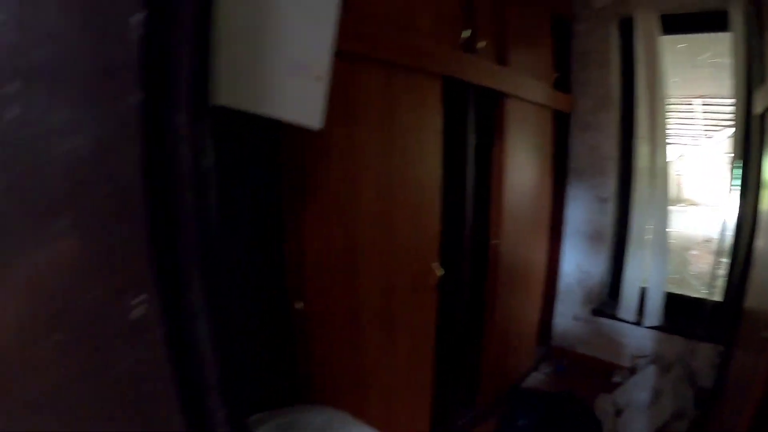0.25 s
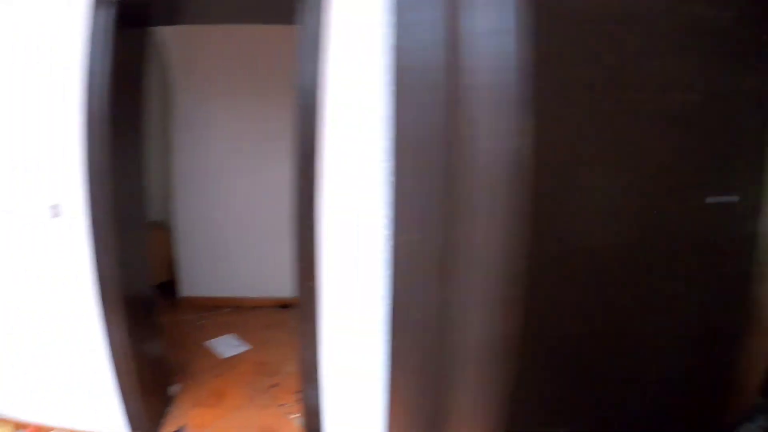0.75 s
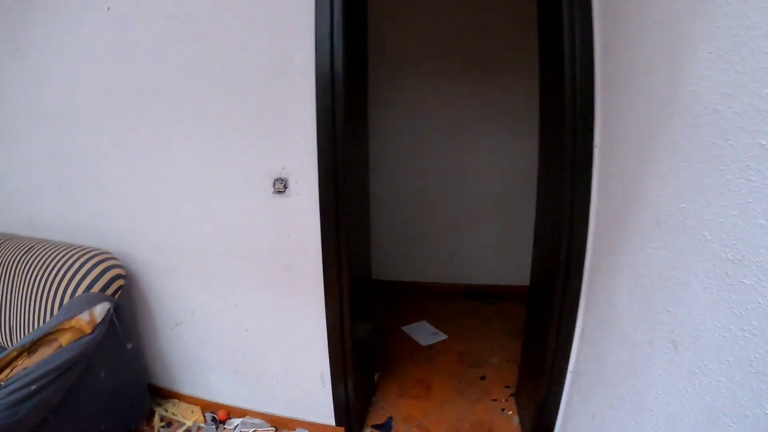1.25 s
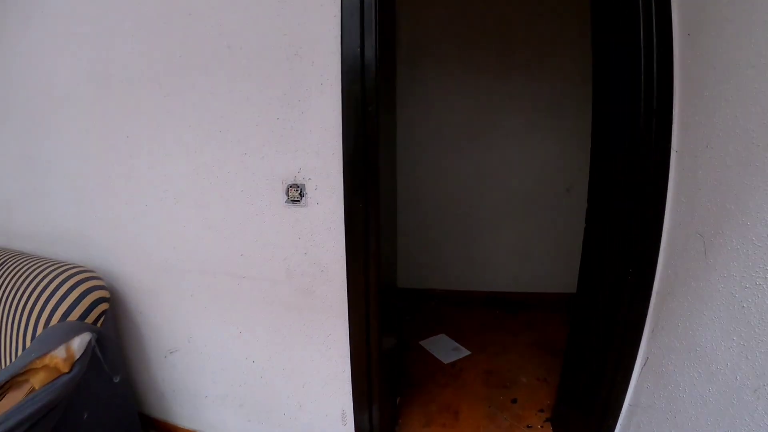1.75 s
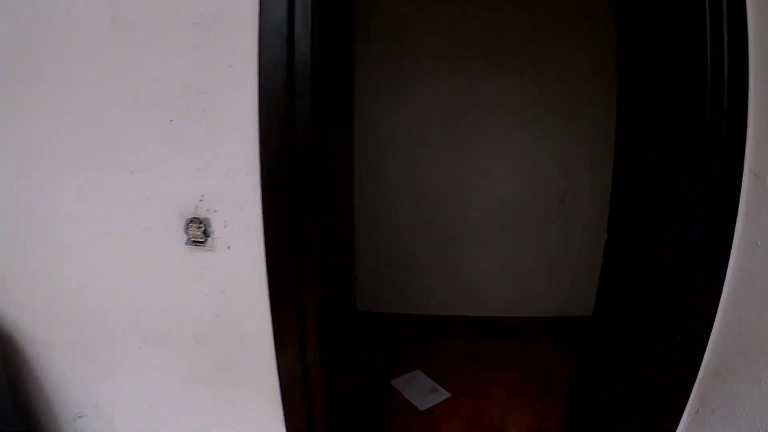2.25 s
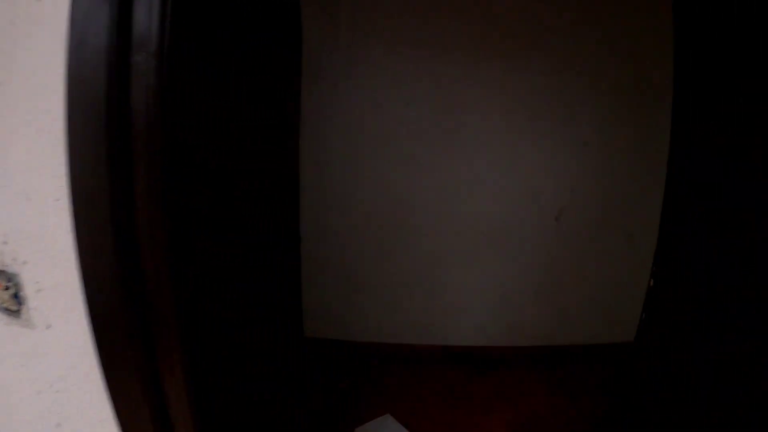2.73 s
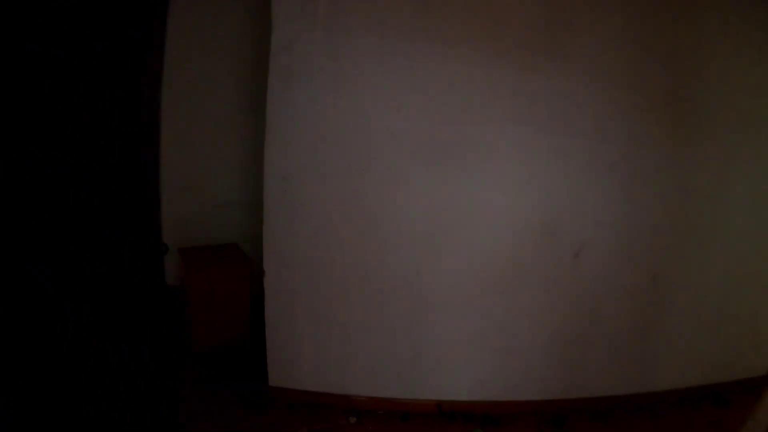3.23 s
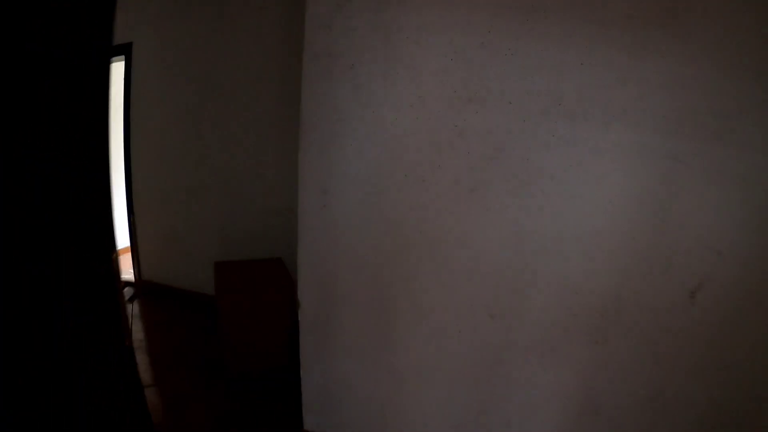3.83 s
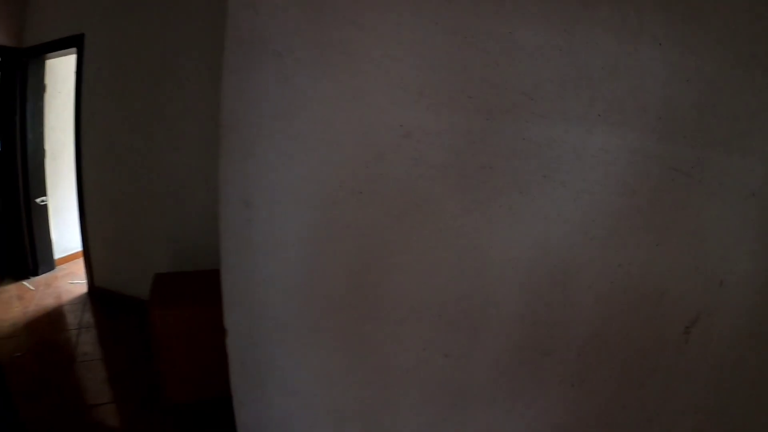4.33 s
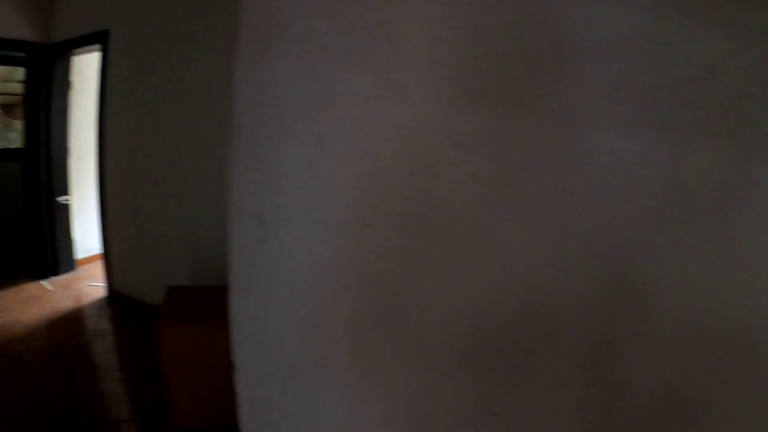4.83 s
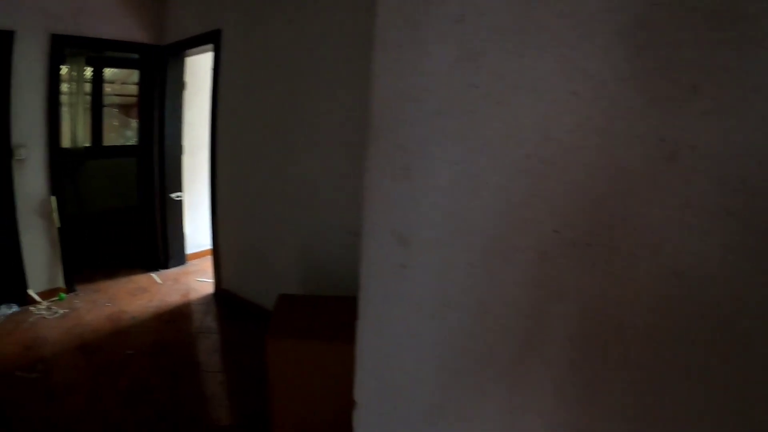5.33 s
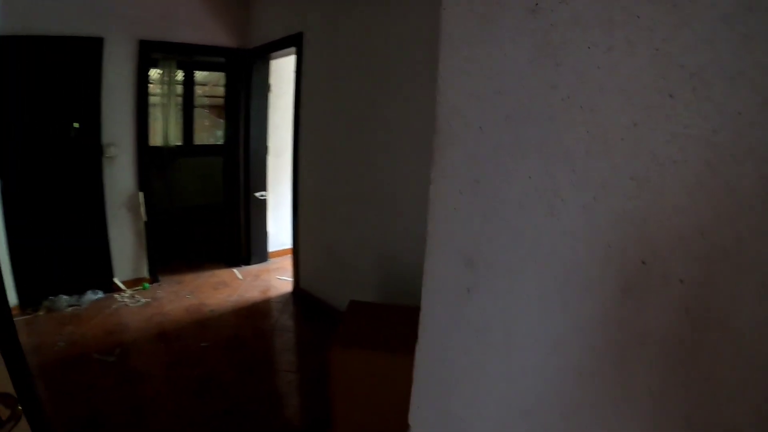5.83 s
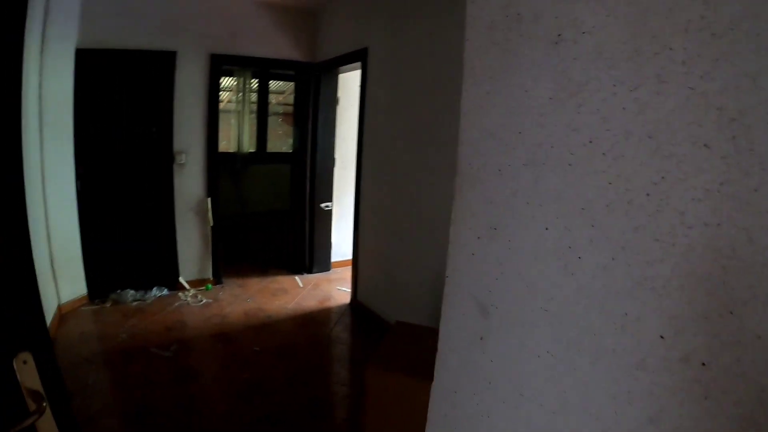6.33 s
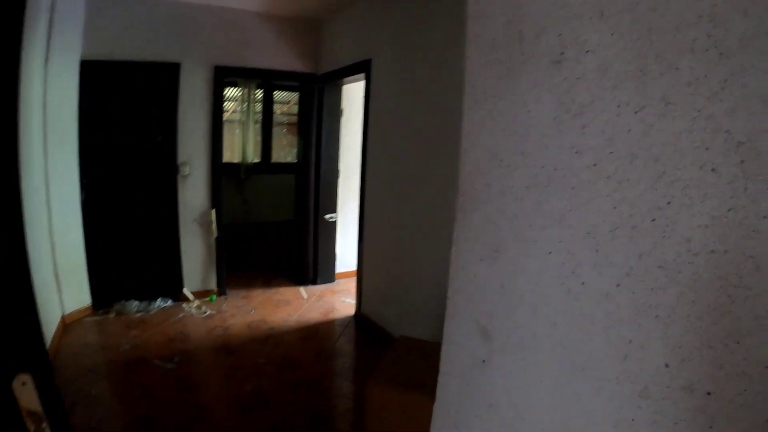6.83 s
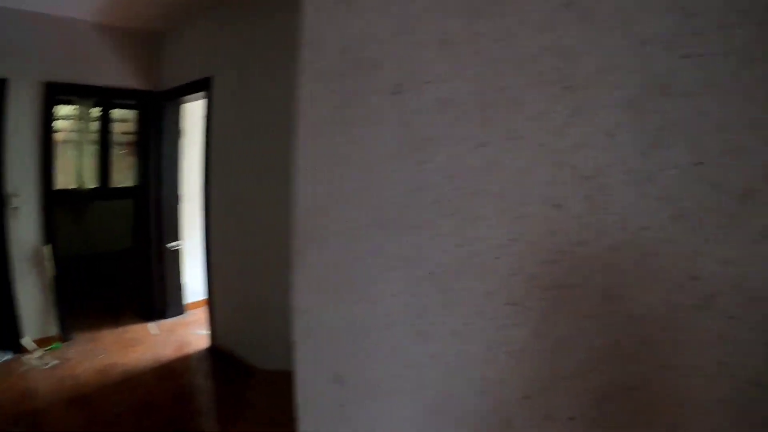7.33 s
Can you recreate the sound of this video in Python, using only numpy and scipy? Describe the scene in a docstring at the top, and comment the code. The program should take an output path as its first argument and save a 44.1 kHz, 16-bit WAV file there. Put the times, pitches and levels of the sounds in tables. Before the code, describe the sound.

Slow footsteps cross a littered floor in an abandoned flat, heard from a carried microphone over a faint, hollow outdoor hush. Each step has a light trouser rustle, a soft heel thump and grinding grit. At the start a shard scrapes, squeaks and tips over with a sharp clink and crack, the loudest moment, in a fairly dull room. Around 1 second air rumbles briefly on the microphone, and a crunching step follows; from here the steps echo in a bare hall. Heels land at about 2.1, 2.9, 3.7, 4.7 and 5.8 seconds, snapping plaster flakes and skidding on grit. Near 3 seconds a glass splinter tinks, and a loose tile clacks underfoot then and again from 3.8 to 4.3 seconds. A scrap of board knocks at about 6.4 seconds. After a short pause, lighter steps scuff, squeak and crackle from 7.1 to 7.6 seconds.

```python
"""Slow steps through an abandoned flat

Someone walks from a furnished bedroom into a bare hall, carrying a microphone. Trousers rustle and
each heel thumps the floor; the sole then grinds plaster grit, snaps flakes, knocks loose pieces and
drags squealing shards along. The rooms ring after every step. Faint outdoor noise seeps in, and air
brushes the microphone as it swings through a doorway."""
import sys
import numpy as np
from scipy import signal
from scipy.fft import rfft, irfft, next_fast_len
from scipy.io import wavfile
from scipy.ndimage import uniform_filter1d

SR = 44100
rng = np.random.default_rng(int(sys.argv[2]) if len(sys.argv) > 2 else 0)


def put_to_file(sound):
    """Save the sound as 16-bit audio at rate SR, in the file named by the first command-line argument."""
    columns = np.atleast_2d(sound).T  # one column per channel
    safe = np.clip(columns, -1, 1)
    whole_steps = np.round(safe * 32767)
    wavfile.write(sys.argv[1], SR, whole_steps.astype(np.int16))


N = 334278
TIME = np.arange(N) / SR
FFT_SIZE = 2048
FREQS = np.maximum(np.arange(FFT_SIZE // 2 + 1) * SR / FFT_SIZE, 1)

# tone of the outdoor noise: f/Hz, level/dB
OUTDOOR_TONE = [(25, -2), (50, -6.5), (95, -38.5), (160, 2), (270, -10.5), (500, -13.5), (1400, -16),
                (2500, -24), (5000, -24.5), (8500, -30.5), (10500, -36.5), (15000, -46)]
# stereo width of sound from all around: f/Hz, side level over middle/dB
STEREO_WIDTH = [(280, -15), (600, -9), (1500, -5), (3500, -2), (9000, 0)]
# how the microphone's two openings differ: f/Hz, left level over right/dB
MIC_BALANCE = [(250, .4), (1200, 2.2), (2800, 2.6), (5500, 0), (9000, -1), (12000, -3.2)]
# bands of the room echo: f/Hz, time to fade by 60 dB/s, level/dB
ECHO_BANDS = [(142, 0.95, 4), (255, 0.8, 5.5), (736, 0.37, -0.5), (1380, 0.74, -1.5), (3225, 0.66, -4),
              (6900, 0.6, -3.5), (9900, 0.4, -9)]
# low notes that hum between the walls: f/Hz, level/dB
ROOM_NOTES = [(65, 12), (144, 11), (268, 5.5), (328, 10.5), (530, 8.5)]
# the walker stands still: middle t/s, half length/s
PAUSES = [(1.06, 0.086), (6.91, 0.34)]
# tone of rubbing cloth: f/Hz, level/dB
CLOTH_TONE = [(60, -31.5), (220, 3), (600, -5.5), (1500, -0.5), (4000, -4.5), (8500, -12.5), (14000, -34.5)]
# tone of snapping plaster: f/Hz, level/dB
PLASTER_TONE = [(100, -29), (350, -12.5), (650, -10), (1000, -4), (2000, -2.5), (4000, -5.5), (6500, -11),
                (9000, -14.5), (11000, -24.5), (13500, -25), (15500, -49.5)]
# large flakes snapping: t/s, level/dB, ring f/Hz, snap level over ring/dB
FLAKE_SNAPS = [(.084, -37, 2630, 4), (.1785, -14, 3000, -28), (.469, -49.5, 2780, 17),
               (1.136, -29, 1960, 12), (1.1472, -24.5, 1640, -1), (1.795, -55, 1690, 10),
               (2.076, -46, 6040, -16), (2.361, -48, 2330, -5), (2.706, -40.5, 2600, 12),
               (2.863, -45, 2380, 11), (3.109, -38, 2870, -1), (4.001, -35, 3740, -42),
               (4.113, -29.5, 3900, 27), (4.4625, -35.5, 3200, -9), (4.4672, -38.5, 4080, -5),
               (4.4877, -37.5, 3540, 2), (4.591, -36.5, 1300, -6), (4.861, -32, 1300, 1),
               (4.8635, -35.5, 4670, -17), (4.969, -43, 1670, 2), (5.0265, -32, 1750, -19),
               (5.029, -28.5, 4300, -2.5), (5.758, -52, 2700, -5), (5.812, -45.5, 1560, -4.5),
               (5.8495, -31.5, 3850, 0.5), (5.93, -36, 3270, 4), (5.937, -37.5, 3310, -2),
               (6.0165, -36, 2200, -5.5), (6.205, -45, 3660, 1), (6.235, -44, 3460, -10),
               (6.259, -46, 1590, -6), (7.375, -33.5, 2340, 24), (7.446, -37.5, 3520, 9),
               (7.47, -29, 2820, 0), (7.5645, -35.5, 1940, -1)]
# the sole skidding on grit: peak t/s, length/s, level/dB, ring f/Hz, snap level over ring/dB
SKIDS = [(0.129, 0.043, -36, 695, 7.5), (0.188, 0.029, -27, 2570, 2.5), (0.532, 0.016, -45.5, 5570, -9),
         (1.154, 0.039, -28.5, 1720, 16), (2.94, 0.035, -41, 1700, 9), (3.029, 0.082, -39, 1890, -5),
         (3.014, 0.04, -38, 860, -15), (3.713, 0.017, -37, 4500, -1), (3.746, 0.017, -40.5, 5040, 13),
         (3.784, 0.023, -27.5, 923, -9), (3.996, .024, -37.5, 1830, 1), (4.334, 0.12, -41.5, 2750, -1.5),
         (4.828, 0.024, -44.5, 1150, -26), (5.175, 0.04, -50, 1490, 1), (7.127, 0.03, -38, 6370, 1),
         (7.396, 0.068, -45, 1120, -0.5)]
# shards and the rubber sole squealing: start t/s, end t/s, first level/dB, last level/dB,
# two strong notes f/Hz, weak note f/Hz, rise in pitch (0.1 is a tenth)
SQUEALS = [(0.028, 0.08, -62, -49.5, 2350, 3740, 4860, 0.032),
           (0.082, 0.199, -43.5, -39, 2387, 4030, 5080, 0.038),
           (0.507, 0.534, -56, -43.5, 1052, 2038, 1208, 0.019),
           (2.556, 2.56, -42.5, -40.5, 1395, 1485, 920, 0.052),
           (2.94, 3.031, -49, -69.5, 10300, 10760, 13500, 0.0025),
           (7.289, 7.393, -44.5, -57, 2570, 2025, 613, 0.22)]
# loose pieces hitting the floor: t/s, level/dB, favoured f/Hz
SHARD_KNOCKS = [(.1401, -16, 3500), (.1746, -21.5, 4700), (.1783, -17, 2800), (.1832, -24, 4300)]  # a shard, shoved along and tipped over
TILE_KNOCKS = [(2.9898, -33.5, 2880), (2.9972, -37, 2950), (3.005, -37, 2900), (3.0105, -31, 2600),
               (3.0275, -39, 3080), (3.773, -30.5, 3000), (3.7906, -23, 3720), (3.7956, -24, 3300),
               (3.8003, -33, 1590), (4.1186, -24, 1920), (4.1232, -24, 2380), (4.1278, -39, 2200),
               (4.3455, -30, 1990)]  # a tile rocking under the sole
GLASS_KNOCKS = [(2.9468, -29, 12500), (2.9528, -48, 10600)]  # a glass splinter caught by the heel
BOARD_KNOCKS = [(6.3934, -27, 1950), (6.4608, -34.5, 1300), (6.464, -39.5, 1050)]  # a scrap of board that tips under the toe and drops back
# the notes each piece rings with: f/Hz, width/Hz, level/dB
SHARD_NOTES = [(2100, 420, -7), (2660, 500, 1), (4190, 500, 0), (5150, 650, -11)]
TILE_NOTES = [(607, 900, 5.5), (1090, 350, 6.5), (1540, 340, 0.5), (2170, 260, -8.5), (2920, 1900, -2.5),
              (3580, 860, -3), (4360, 910, -3.5), (7800, 2400, -3), (10000, 5000, -10)]
GLASS_NOTES = [(10380, 550, 11), (13400, 560, -8.5)]
BOARD_NOTES = [(1030, 670, 0), (1950, 570, 2), (4480, 18000, -16)]
# footsteps: heel t/s, thump level/dB, thump f/Hz, grinding level/dB, time the weight stays on/s
STEPS = [(0.097, -36, 147, -57.5, 0.15), (.18, -39, 400, -66, 0.41), (1.148, -33, 690, -53, 0.091),
         (2.126, -32, 218, -56, 0.43), (2.912, -26.5, 210, -47.5, 0.12), (3.698, -31, 208, -53.5, 0.53),
         (4.685, -33.5, 227, -48, 0.038), (5.84, -41, 200, -60, 0.6), (7.042, -53.5, 328, -76, 0.15),
         (7.108, -40.5, 193, -56.5, 0.08), (7.291, -44, 183, -52, .3)]


def amp(db):
    """Turn decibels into a gain."""
    return 10 ** (np.asarray(db) / 20)


def unit(x):
    """Scale a sound to an average power of 1."""
    return x / np.sqrt(np.mean(x ** 2))


def hit_level(x, db):
    """Give a short sound the energy of 5 ms at this level."""
    return x * amp(db) * np.sqrt(.005 * SR / np.sum(x ** 2))


def db_at(table, hz):
    """Read a table's level at any frequency, sliding between its rows."""
    table = np.array(table)
    return np.interp(np.log(np.maximum(hz, 1)), np.log(table[:, 0]), table[:, 1])


def tint(x, gain):
    """Filter a sound: gain(f) says how much of each frequency is kept."""
    size = next_fast_len(len(x), True)
    return irfft(rfft(x, size) * gain(np.fft.rfftfreq(size, 1 / SR)), size)[:len(x)]


def with_tone(x, table):
    """Filter a sound by a table of frequencies and levels."""
    return tint(x, lambda f: amp(db_at(table, f)))


def ring(force, gain):
    """Let a force shake an object that answers with this gain at FREQS."""
    cepstrum = irfft(np.log(gain + 1e-5))
    cepstrum[1:FFT_SIZE // 2] *= 2  # folded so the ringing never comes before the push
    cepstrum[FFT_SIZE // 2 + 1:] = 0
    return signal.fftconvolve(force, irfft(np.exp(rfft(cepstrum))))


def resonance(hz, q):
    """A peak in the gain around one pitch; a higher q makes it narrower."""
    return 1 / (1 + (q * (FREQS / hz - hz / FREQS)) ** 2)


def add(track, s, x):
    """Mix x into the track, starting at s seconds."""
    start = int(np.clip(s * SR, 0, N - 1))
    track[start:start + len(x)] += x[:N - start]


def wander(rate):
    """Drift to a new random value rate times a second."""
    points = rng.standard_normal(N // 8)
    return np.interp(TIME * rate, np.arange(len(points)), points)


def clicks(rate, scatter_db, size=N):
    """Tiny random clicks of unequal size, about rate of them a second."""
    timing, sign, strength = rng.random((N, 3))[:size].T
    heights = amp(scatter_db * np.minimum(-np.log(1 - strength), 3))
    return unit((timing < rate / SR) * np.sign(sign - .5) * heights + 1e-9)


def unpitched(burst):
    """Even out a burst's frequencies so no pitch stands out; keep its first half."""
    spectrum = rfft(burst)
    return irfft(spectrum / np.abs(spectrum) ** .85)[:len(burst) // 2]


def surround(mid, side):
    """Sound from all around: left and right share the bass but not the treble."""
    return mid + np.outer([1, -1], with_tone(side, STEREO_WIDTH))


def moving():
    """1 while the walker is under way, near 0 during the pauses."""
    return np.prod([1 - np.exp(-((TIME - s) / half_s) ** 4) for s, half_s in PAUSES], axis=0)


def outdoor_hush(level_db=-62.5, swell_db=1.5):
    """Faint, hollow outdoor noise seeps through the rooms."""
    mid, side = (unit(with_tone(rng.standard_normal(N), OUTDOOR_TONE)) for _ in range(2))
    return surround(mid, side) * amp(level_db + swell_db * wander(3.7))


def air_on_mic(thumps, walking_db=-69.5, swing_db=-46.5, swing_at_s=0.96, swing_s=0.15, jolt_db=-11):
    """Air rumbles on the microphone as it is carried, swung through the doorway and jolted by steps."""
    mid, side = (unit(tint(rng.standard_normal(N), lambda f: f / np.hypot(f, 20) / (1 + (f / hz) ** 4)))
                 for hz in (48, 24))
    rumble = mid + amp(-2) * np.outer([1, -1], side)
    at_hand = np.roll(thumps, int(0.057 * SR))  # each thump reaches the hand a little later
    jolt = np.sqrt(np.abs(uniform_filter1d(at_hand ** 2, SR // 7)))
    swing = amp(swing_db) * np.exp(-((TIME - swing_at_s) / swing_s) ** 2)
    return rumble * (amp(walking_db) * moving() + swing + amp(jolt_db) * jolt)


def room_hum(x, fade_s=0.46):
    """Low notes bounce between the bare walls and hum on after each step."""
    t = TIME[:SR]
    fade = amp(-60 * t / fade_s)
    response = sum(amp(db) * np.sin(2 * np.pi * hz * t) for hz, db in ROOM_NOTES) * fade
    return signal.fftconvolve(x, 2 * response / fade.sum())[:N]


def room_echoes(x, decay_share, echo_db, build_s=0.00022, slap_db=-4, slap_s=0.023):
    """Quick slaps off near walls and a wash of echoes; their pattern changes as the walker moves on."""
    t, pitches = TIME[:SR * 4 // 5], np.log(np.array(ECHO_BANDS)[:, 0])
    bands, out = [], np.zeros((2, N))
    for share, (_, fade_s, db) in zip(np.eye(len(ECHO_BANDS)), ECHO_BANDS):
        mid, side = (tint(rng.standard_normal(len(t)),
                          lambda f: np.sqrt(np.interp(np.log(f + 1), pitches, share))) for _ in range(2))
        fade = amp(-60 * t / (fade_s * decay_share)) * (1 - np.exp(-(t / build_s) ** 2))
        bands.append((surround(mid, side), amp(db + echo_db) * fade / np.linalg.norm(fade)))
    for start in range(0, N, SR // 2):  # a new pattern every half second
        piece = x[start:start + SR // 2]
        if piece.any():
            wash = sum(np.roll(noise, start // 7, axis=1) * fade for noise, fade in bands)
            mid, side = (clicks(rate=500, scatter_db=2, size=len(t)) for _ in range(2))
            slaps = surround(mid, side) * t * np.exp(-2 * t / slap_s)
            response = wash + amp(slap_db + echo_db) * slaps / np.linalg.norm(slaps)
            for channel in range(2):
                add(out[channel], start / SR, signal.fftconvolve(piece, response[channel]))
    return out


def trousers(stir_db=-69.5, over_thump_db=-29.5, lead_s=0.1, spread_s=0.09):
    """Cloth stirs with the walk and brushes past before each heel lands; harder steps rustle more."""
    brush = sum(amp(db + over_thump_db) * np.exp(-((TIME - s + lead_s) / spread_s) ** 2)
                for s, db, *_ in STEPS)
    cloth = unit(with_tone(clicks(rate=8100, scatter_db=2), CLOTH_TONE))
    return moving() * (amp(stir_db) + brush) * cloth


def foot_weight(t, roll_on_s=0.15, roll_off_s=0.2):
    """Pressure on the grit at times t: it builds after each heel lands, holds and lets go."""
    total = 0
    for s, _, _, grind_db, stay_s in STEPS:
        age = np.maximum(t - s, 0)
        press = 1 - np.exp(-(age / roll_on_s) ** 2)
        release = np.exp(-np.maximum(age - stay_s, 0) / roll_off_s)
        total = total + amp(grind_db) * press * release
    return total


def plaster(hz, snap_db, q, treble_hz=8000):
    """A flake's gain at FREQS: a short ring plus a broad snap; a softer snap loses its treble first."""
    snap = amp(snap_db + min(snap_db, 0) * FREQS / treble_hz + db_at(PLASTER_TONE, FREQS))
    return np.hypot(resonance(hz, q) ** 2, snap)


def grinding():
    """Fine grit is crushed for as long as the foot presses on it."""
    grains = clicks(rate=600, scatter_db=6) * foot_weight(TIME)
    return ring(grains, unit(plaster(hz=1860, snap_db=1, q=0.31)))[:N]


def skids(rise_share=.38):
    """The skidding sole presses down and lets go, crushing a thick stream of grains."""
    out = np.zeros(N)
    for s, length_s, db, hz, snap_db in SKIDS:
        rise_s, fall_s = length_s * rise_share, length_s * (1 - rise_share)
        t = TIME[int(max(s - 3 * rise_s, 0) * SR):int((s + 4 * fall_s) * SR)] - s
        grains = clicks(rate=5500, scatter_db=5, size=len(t))
        press = np.exp(np.minimum(t / rise_s, -t / fall_s))
        add(out, s + t[0], amp(db) * ring(grains * press, unit(plaster(hz, snap_db, q=0.68))))
    return out


def squeals(flutter_hz=450, weak_db=-7, rasp_db=-14):
    """A shard or sole sticks and slips, which keeps it ringing; its notes rise as the foot presses."""
    out = np.zeros(N)
    rasp = unit(with_tone(clicks(rate=1900, scatter_db=3), PLASTER_TONE))
    for start, end, first_db, last_db, *notes, rise in SQUEALS:
        span = slice(int(start * SR), int(end * SR))
        progress = np.linspace(0, 1, len(TIME[span]))
        phase_per_hz = 2 * np.pi * np.cumsum(1 + rise * progress) / SR
        squeal = sum(amp(db) * wander(flutter_hz)[span] * wave(hz * phase_per_hz)
                     for hz, db in zip(notes, (0, 0, weak_db)) for wave in (np.sin, np.cos))
        level = amp(first_db + (last_db - first_db) * progress)
        add(out, start, (unit(squeal) + amp(rasp_db) * rasp[span]) * level)
    return out


def knocks(hits, notes, q, chatter_s, chatter_db):
    """A hard piece hits the floor and chatters; where it touches decides which of its notes ring."""
    out, t = np.zeros(N), TIME[:SR // 40]
    body = np.sqrt(sum((amp(db) * resonance(hz, hz / width)) ** 2 for hz, width, db in notes))
    for s, db, favoured_hz in hits:
        chatter = unpitched(rng.standard_normal(len(t)) * np.exp(-t / chatter_s))
        force = amp(chatter_db) * chatter / np.linalg.norm(chatter)
        force[0] += 1  # the knock itself
        add(out, s, hit_level(ring(force, body * resonance(favoured_hz, q)), db))
    return out


def crumbs(count=105, over_weight_db=2, spread_db=2.5, hz=2320, spread_octaves=0.34, snap_db=-1):
    """Small flakes give way at random, louder under more weight; gives rows like FLAKE_SNAPS."""
    level_luck, pitch_luck = rng.standard_normal((count, 2)).T
    times = (np.arange(count) + rng.random(count)) / count * TIME[-1]
    levels = 20 * np.log10(foot_weight(times) + 1e-9) + over_weight_db + spread_db * level_luck
    pitches = hz * 2 ** (spread_octaves * pitch_luck)
    return list(zip(times, levels, pitches, np.full(count, snap_db)))


def snapping_flakes(crumbly_cycles=9.3, clean_cycles=2.2, clean_above_db=-25):
    """A flake breaks, then splinters; loud breaks are cleaner and small, high flakes finish sooner."""
    out, t = np.zeros(N), TIME[:SR // 20]
    splinters = clicks(rate=3500, scatter_db=3)
    for k, (s, db, hz, snap_db) in enumerate(FLAKE_SNAPS + crumbs()):
        extra_cycles = (crumbly_cycles - clean_cycles) / (0.5 + np.exp((db - clean_above_db) / 2))
        crumble_s = (clean_cycles + extra_cycles) / hz
        burst = unpitched(splinters[k * len(t):][:len(t)] * np.exp(-t / crumble_s))
        # at 0.94 ms of crumbling the splinters are as strong as the break
        force = burst * np.sqrt(crumble_s / 0.00094) / np.linalg.norm(burst)
        force[0] += 1  # the break itself
        add(out, s, hit_level(ring(force, plaster(hz, snap_db, q=0.78)), db))
    return out


def heel_thumps(shudder_s=0.016, shudder_db=-33, floor_hz=63, floor_db=-2, hard_step_db=-23):
    """The shoe lands with a soft blow on the floor and shudders as it settles."""
    out, t = np.zeros(N), TIME[:SR // 6]
    rubber = 1 / np.hypot(1, (FREQS / 620) ** 3)  # the sole cushions the treble away
    floor = amp(floor_db) * resonance(floor_hz, q=5.4)
    for s, db, hz, _, _ in STEPS:
        body = resonance(hz, q=1.1) * rubber + floor * amp(db - hard_step_db)  # hard steps boom more
        for lag_s, part_db in (0, 0), (0.00726, -4), (0.034, -4):  # heel edge, flat heel, ball of foot
            push = amp(shudder_db) * rng.standard_normal(len(t)) * np.exp(-t / shudder_s) / 2
            push[0] += 1
            add(out, s + lag_s, hit_level(ring(push, body), db + part_db))
    return out


def scene(hall_from_s=.8, muffle_hz=6500, thump_to_room_db=-6, board_to_room_db=-4, lean_db=-18):
    """The feet are heard directly and through whichever room the walker is in."""
    thumps = heel_thumps()
    tile = knocks(TILE_KNOCKS, TILE_NOTES, q=1.5, chatter_s=0.0014, chatter_db=0.5)
    shard = knocks(SHARD_KNOCKS, SHARD_NOTES, q=0.78, chatter_s=0.0004, chatter_db=-13)
    glass = knocks(GLASS_KNOCKS, GLASS_NOTES, q=.5, chatter_s=0.00077, chatter_db=5)
    board = knocks(BOARD_KNOCKS, BOARD_NOTES, q=0.48, chatter_s=0.0038, chatter_db=14)
    feet = tile + shard + glass + snapping_flakes() + grinding() + skids() + squeals() + trousers()
    feet += amp(thump_to_room_db) * thumps + amp(board_to_room_db) * board
    in_bedroom = TIME < hall_from_s
    # among the bedroom's furniture and cloth the steps are duller and die sooner
    bedroom = tint(feet, lambda f: 1 / np.hypot(1, (f / muffle_hz) ** 3)) * in_bedroom
    hall = feet * ~in_bedroom
    echoes = room_echoes(bedroom, decay_share=0.5, echo_db=-2)
    echoes += room_echoes(hall, decay_share=0.94, echo_db=1)
    # the rest of the thumps and board skips the echoes, so they sound closer
    close = (1 - amp(thump_to_room_db)) * thumps + (1 - amp(board_to_room_db)) * board
    close = close + amp(lean_db) * np.outer([1, -1], tile)  # the tile lies a little to the left
    return bedroom + hall + close + echoes + room_hum(feet) + outdoor_hush() + air_on_mic(thumps)


def record(dry, lag_s=.000018, top_hz=15500):
    """The microphone's two openings differ in tone and the left hears slightly later; the top is cut."""
    left = tint(dry[0], lambda f: amp(db_at(MIC_BALANCE, f) / 2) * np.exp(-2j * np.pi * f * lag_s))
    right = tint(dry[1], lambda f: amp(-db_at(MIC_BALANCE, f) / 2))
    return signal.sosfilt(signal.ellip(10, .2, 80, top_hz, fs=SR, output="sos"), [left, right])


dry = scene()
out = record(dry)
put_to_file(out)
```